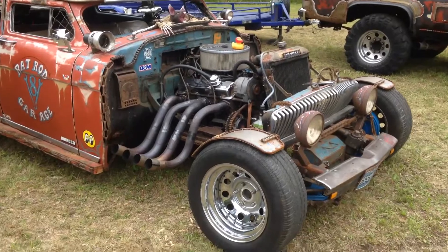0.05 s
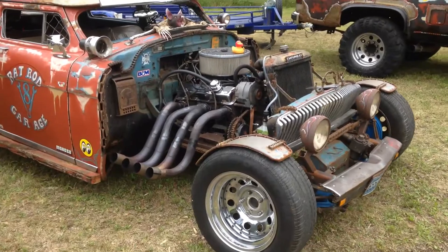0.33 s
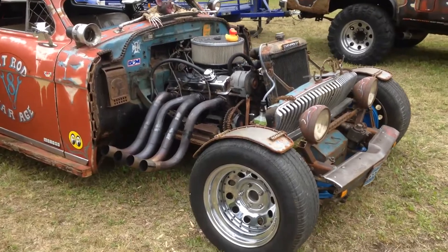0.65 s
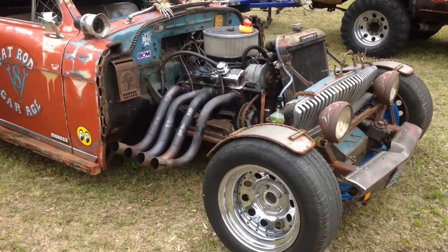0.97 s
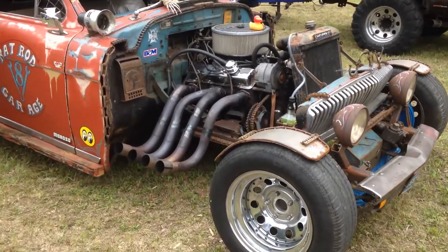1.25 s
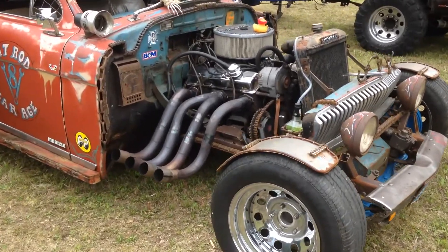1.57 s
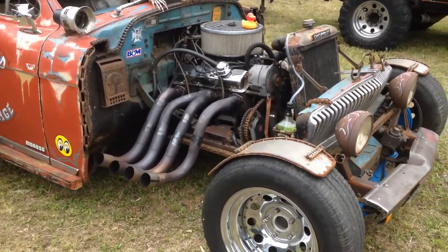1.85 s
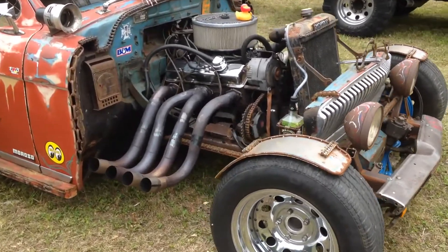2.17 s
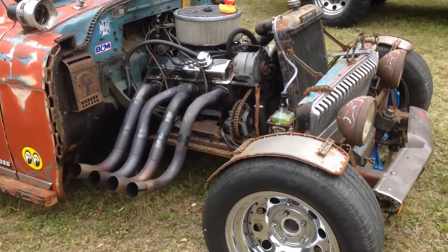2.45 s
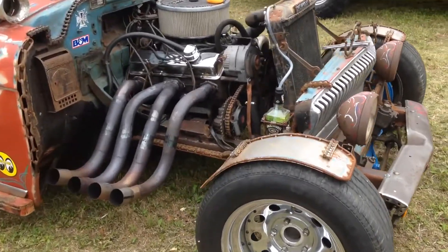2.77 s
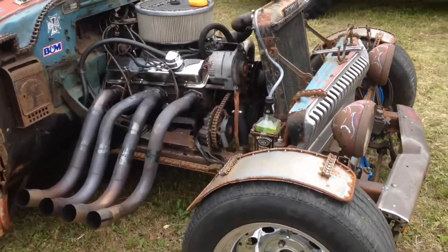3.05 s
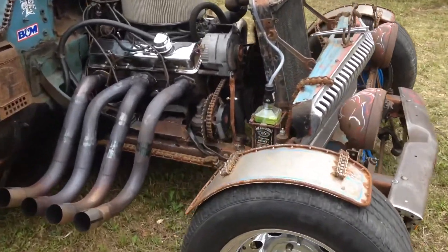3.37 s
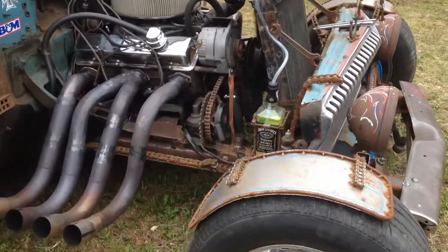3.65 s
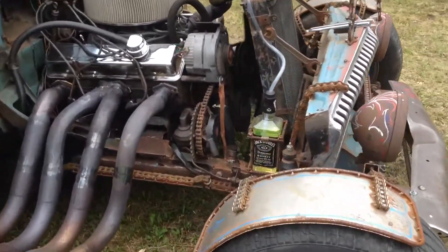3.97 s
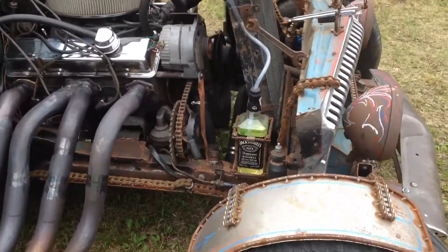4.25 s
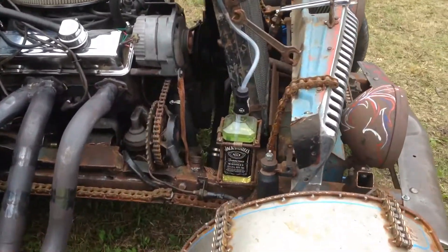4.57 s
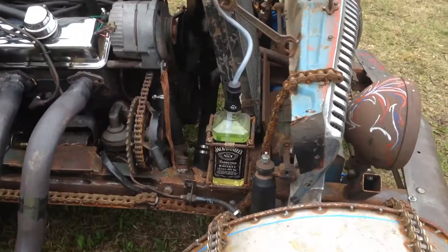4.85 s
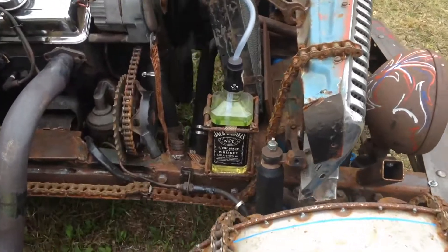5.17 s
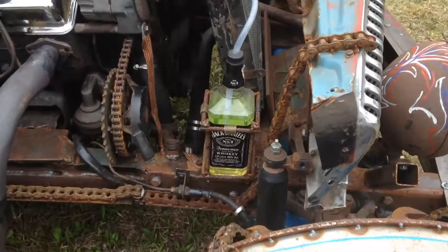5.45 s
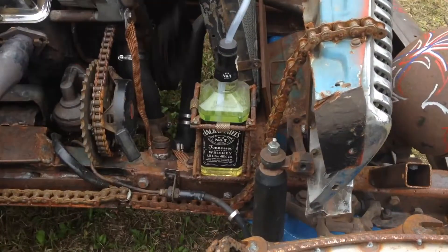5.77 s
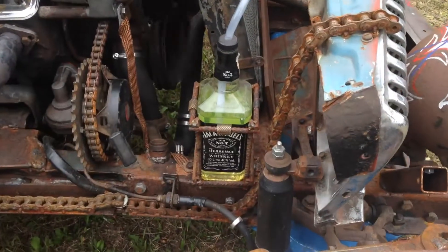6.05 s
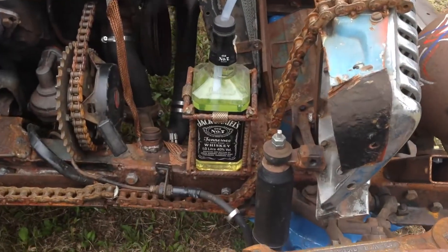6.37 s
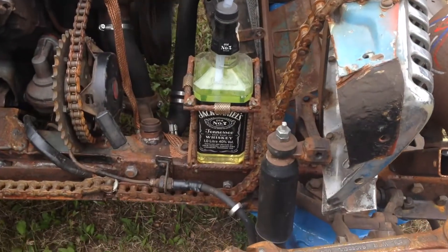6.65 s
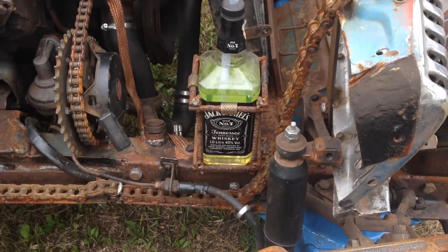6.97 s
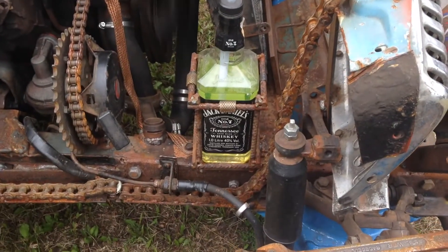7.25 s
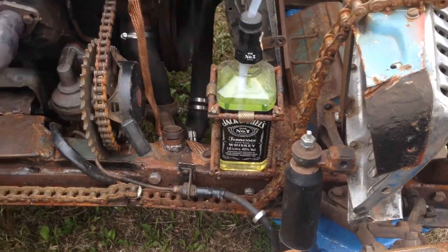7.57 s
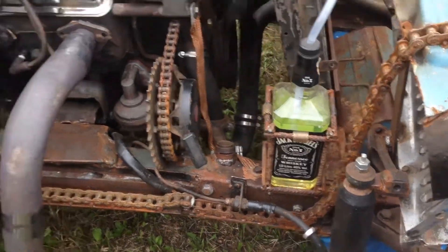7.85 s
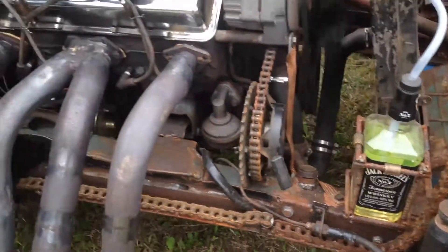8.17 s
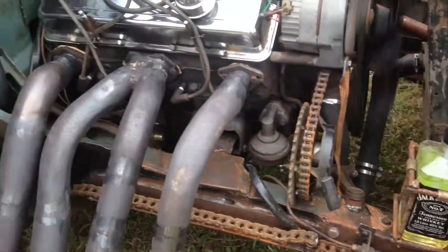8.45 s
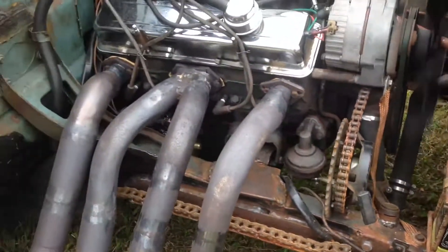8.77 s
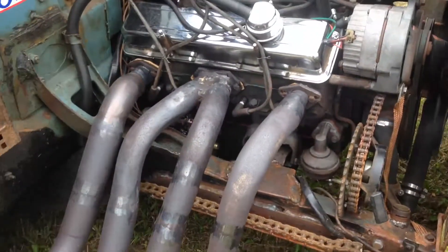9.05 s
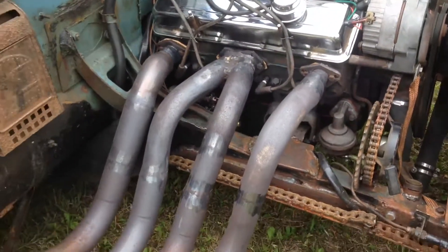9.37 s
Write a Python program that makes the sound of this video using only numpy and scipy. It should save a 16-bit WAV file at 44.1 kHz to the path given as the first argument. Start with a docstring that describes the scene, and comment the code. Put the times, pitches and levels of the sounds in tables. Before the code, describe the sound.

A V8 hot rod idles outdoors on grass through short open exhaust pipes. Deep, rapid thumps and a throaty bark run throughout, with sharp, rhythmic spits of gas on top and a steady rush of fan and belts underneath. The pipes ring faintly and sometimes clank. As the microphone moves in from beside the car to just over the pipes, the engine grows somewhat louder and fuller, holding its idle speed.

```python
"""On open grass, a V8 idles through eight short exhaust pipes while the microphone moves in close.
Each firing thumps its own pipe, then barks and throbs in the pipe's overtones. The nearest cylinders
also spit a sharp burst of gas once a cycle. The pipe steel rings lightly throughout, and a few
firings crack hard enough to clank it. Underneath runs the steady rush of fan, belts and intake."""
import sys
import numpy as np
from scipy import signal
from scipy.fft import rfft, irfft
from scipy.io import wavfile
from scipy.ndimage import uniform_filter1d

SR = 44100
rng = np.random.default_rng(int(sys.argv[2]) if len(sys.argv) > 2 else 0)


def pcm_store(signal):
    """Save signal as 16-bit PCM."""
    levels = np.round(np.clip(np.atleast_2d(signal), -1, 1) * 32767)
    wavfile.write(sys.argv[1], SR, levels.astype(np.int16).T)


N = 415422
TIME = np.arange(N) / SR

# exhaust valve openings: cycle_phase (0-1), bark_db, throb_db, spit_far_db, spit_near_db, swell_s
VALVE_OPENINGS = [(.11, 3, -13, -12, -7.5, 0.0034), (.233, 5, 7, 2, 1, 0.0038),
                  (.365, 0, 1.5, -36, -24, .0051), (.491, -0.5, 6.5, -2, .5, .0027),
                  (.622, -4.5, -4, -25, -23, 0.0038), (.783, 0, -5, -15.5, -19.5, 0.0019),
                  (.86, -4.5, -11, -15, -18, 0.0037), (.99, -6.5, -20, -27, -31, .005)]


def thumps(scatter_db=1.72, pipe_width_hz=25, deep_hz=68.7, deep_width_hz=5, deep_db=-3):
    """The low end: each firing is a pressure kick that rings the lowest note of its own pipe."""
    # one row a cylinder: cycle_phase (0-1), level_db, pitch_hz
    cylinders = [(.041, -5, 73), (.14, -9, 126), (.297, -6, 159), (.434, -7, 117), (.549, -19, 71),
                 (.666, -14, 164), (.796, -7, 103), (.945, -11, 180)]
    # boom of the space between pipes, body and ground: pitch_hz, width_hz
    booms = [(88, 24), (150, 17)]
    out = np.zeros(N)
    for phase, db, hz in cylinders:
        kicks = np.zeros(N)
        for s in firings(phase, jitter_s=0.00013):
            add(kicks, s, gain_of([db + scatter_db * rng.standard_normal()]))
        out -= resonate(kicks, hz, pipe_width_hz)
    for hz, width in booms:
        out = resonate(out, hz, width)
    return evened(out + gain_of(deep_db) * resonate(out, deep_hz, deep_width_hz))


def spits(near, tail_s=0.019, whistle_db=-11, crackle_db=2.5, scatter_db=1.6):
    """Turbulent gas jets swell and collapse in milliseconds, each with a faint whistle of its own."""
    # tone of escaping gas, from afar and close by: frequency_hz, level_db
    far_eq = [(200, -14), (700, -5.5), (1150, -4.5), (2000, -4.5), (2600, -5), (3900, 1), (5300, -1),
              (7500, -3.5), (9500, -3), (12000, -6), (15000, -16)]
    near_eq = [(200, -18), (700, 4), (980, -8), (1300, 0.5), (2100, -3.5), (2750, -3.5), (3900, -1.5),
               (5300, -3), (7500, -3), (9000, -7), (12000, -10), (15000, -18.5)]
    # pipe resonances that colour the spits, from afar and close by: pitch_hz, width_hz, far_db, near_db
    pipe_resonances = [(850, 44, 1, -14), (965, 51, 14.5, -11), (1270, 120, -14, 1), (1572, 85, 7.5, -14),
                       (1920, 93, 7, -14), (1870, 130, -39, -6), (2310, 114, -18, 5.5)]
    t, out = np.arange(SR // 20) / SR, np.zeros(N)
    for phase, _, _, far_db, near_db, swell_s in VALVE_OPENINGS:
        for s in firings(phase, jitter_s=.0002):
            close = np.interp(s, TIME, near)
            stretch = (1 + 0.28 * (close - .5)) * np.exp(.11 * rng.standard_normal())
            age = t / (swell_s * stretch)
            burst = (age * np.exp(1 - age)) ** 3
            # the engine bay scatters the burst into a tail, more so close in
            tail_gain = gain_of(between((-20, -15), close))
            tail = tail_gain * np.minimum(age, 1) ** 2 * np.exp((swell_s - t) / tail_s)
            hiss = rng.standard_normal(len(t))
            whistle = evened(resonate(hiss, rng.uniform(2960, 7940), width_hz=500))
            gas = hiss + gain_of(whistle_db) * whistle
            eddies = gain_of(crackle_db * evened(uniform_filter1d(rng.standard_normal(len(t)), size=24)))
            hit_db = between((far_db, near_db), close) + scatter_db * rng.standard_normal()
            add(out, s, gain_of(hit_db) * np.hypot(burst, tail) * eddies * gas)
    jets = crossfade_eq(out, far_eq, near_eq, near)
    return jets + sum(gain_of(between(ends_db, near)) * resonate(jets, hz, width)
                      for hz, width, *ends_db in pipe_resonances)


def beamed(jets, in_beam, treble_hz=9500, treble_db=(-3, 4)):
    """The jets' top end carries best straight out of the pipe mouths."""
    treble = signal.sosfiltfilt(signal.butter(2, treble_hz, "high", fs=SR, output="sos"), jets)
    return jets + (gain_of(between(treble_db, in_beam)) - 1) * treble


def bark(near, decay_s=0.013, roughness=0.67, scatter_db=2.0, lead_s=0.001964):
    """Higher overtones: every pipe has its own echo pattern, roughened afresh by each firing."""
    # tone of the bark, from afar and close by: frequency_hz, level_db
    far_eq = [(150, -31.5), (220, 4), (300, 4.5), (370, -11), (450, -10), (580, -6.5), (690, 1.5), (840, 2),
              (960, -3.5), (1100, -21), (1400, -13), (2000, -15.5), (3500, -25)]
    near_eq = [(150, -42.5), (230, -4), (335, -3), (410, -2), (500, 2), (580, -3), (690, 3), (780, -4),
               (900, -13.5), (1300, -14.5), (2000, -23), (3500, -32.5)]
    t, out = np.arange(SR // 16) / SR, np.zeros(N)
    fade = np.exp(-t / decay_s)
    for phase, db, *_ in VALVE_OPENINGS:
        # whitened noise: a smear in time with no colour of its own
        spectrum = rfft(rng.standard_normal(len(t)) * fade)
        echoes = evened(irfft(spectrum / abs(spectrum), len(t)) * np.exp(-t / (4 * decay_s)))
        for s in firings(phase, jitter_s=0.00015):
            grit = evened(rng.standard_normal(len(t)) * fade)
            gas = np.sqrt(1 - roughness ** 2) * echoes + roughness * grit
            hit_db = db * (1 - 0.4 * np.interp(s, TIME, near))  # close in, the pipes are more even
            add(out, s - lead_s, gain_of(hit_db + scatter_db * rng.standard_normal()) * gas)
    return crossfade_eq(out, far_eq, near_eq, near)


def throb(near, far_hz=292, near_hz=328, width_hz=110, scatter_db=2.5, late_s=0.00508):
    """The pipes' first overtone answers every kick cleanly, a little late."""
    kicks = np.zeros(N)
    for phase, _, db, *_ in VALVE_OPENINGS:
        for s in firings(phase):
            add(kicks, s + late_s, gain_of([db + scatter_db * rng.standard_normal()]))
    far = close = kicks
    for _ in range(3):
        far, close = resonate(far, far_hz, width_hz), resonate(close, near_hz, width_hz)
    return evened(between((evened(far), evened(close)), near))


def cracks(t60_s=0.05, overtone_ratio=1.2, overtone_db=-8):
    """Now and then a firing hits hard enough to clank the pipe."""
    # the hardest firings: start_s, level_db, pitch_hz
    hits = [(0.1372, -17, 1120), (0.3718, -18, 1130), (0.607, -14, 1240), (1.2995, -16.5, 1140),
            (4.5765, -15.5, 1310), (4.6917, -11.5, 1200), (5.1822, -13, 1186), (5.5282, -17, 1270),
            (5.7583, -11, 1226), (6.2357, -15, 1165), (6.6598, -16, 1225), (7.006, -15, 1380),
            (8.072, -12, 1190), (8.8865, -10, 1120), (9.238, -15, 1290), (9.3706, -16, 1190)]
    out = np.zeros(N)
    for s, db, hz in hits:
        clank = steel_ping(hz, t60_s, spread=0.061)
        overtone = steel_ping(overtone_ratio * hz, t60_s, spread=0.062)
        add(out, s, gain_of(db) * (clank + gain_of(overtone_db) * overtone))
    return out


def steel_ringing(jet_db, high_db=-17.0):
    """The steel rings a little in every cycle; its high modes follow the level of the jets."""
    # pings of the pipe steel: cycle_phase (0-1), pitch_hz, level_db, t60_s, scatter_db
    pings = [(.25, 1100, -1, 0.074, 2), (.4, 1280, -5.5, 0.11, 3), (.635, 1210, 3.5, .065, 1),
             (.64, 1680, -4, 0.067, 4.5), (.5, 1600, -9.5, .044, 4), (.5, 1850, -4, 0.041, 5),
             (.5, 2100, -1.5, 0.043, 2.5), (.635, 4800, 0, 0.05, 4), (.5, 4000, 4.5, 0.03, 6),
             (.8, 3900, -4, .022, 4)]
    # fader ride on the low ringing: time_s, level_db
    low_ride = [(0, -40), (1.5, -34.5), (2.6, -39.5), (4.6, -28), (5.2, -28), (7.35, -34.5), (8, -28),
                (9.42, -27.5)]
    low, high = np.zeros(N), np.zeros(N)
    for phase, hz, db, t60_s, scatter_db in pings:
        for s in firings(phase, jitter_s=.0006):
            strength = gain_of(db + scatter_db * rng.standard_normal())
            add(low if hz < 3000 else high, s, strength * steel_ping(hz, t60_s))
    return gain_of(curve(low_ride)) * evened(low) + gain_of(jet_db + high_db) * evened(high)


def steel_ping(hz, t60_s, spread=0.0924, attack_s=0.00028):
    """A shock front strikes a tight cluster of four steel modes."""
    t = np.arange(SR // 16) / SR
    modes_hz = hz * (1 + spread * rng.uniform(-1.01, 1, size=(4, 1)))
    ping = np.sin(2 * np.pi * (modes_hz * t + rng.random(size=(4, 1)))).sum(0)
    ping *= np.exp(-np.log(1000) * t / t60_s) * (1 - np.exp(-t / attack_s))
    return ping / abs(ping).max()


def rush():
    """Fan, belts and intake lay down a steady bed of noise."""
    # tone of the bed: frequency_hz, level_db
    rush_eq = [(15, 11), (45, 18), (200, 8), (800, 9), (1600, -1), (2700, -2), (4500, -5), (8000, -5),
               (12000, -11), (15000, -24)]
    return evened(colour(rng.standard_normal(N), rush_eq))


def firings(phase, jitter_s=0.000067, start_phase=.0534):
    """Times at which the four-stroke cycle (two crank turns) passes a given phase."""
    # the idle, hunting a little: time_s, speed_rpm
    idle = [(0.0, 1033.9), (0.72, 1023.9), (1.28, 1052.0), (1.74, 1019.6), (1.9, 1043.0), (2.65, 1049.8),
            (2.89, 1024.3), (3.49, 1005.8), (3.8, 1016.6), (4.48, 1006.3), (4.75, 1039.3), (5.79, 1044.4),
            (5.94, 1016.4), (6.15, 1038.9), (8.07, 1036.8), (8.23, 1016.7), (8.56, 1042.2), (9.42, 1020.2)]
    cycles = start_phase + np.cumsum(curve(idle)) / (2 * 60 * SR)
    marks = np.arange(np.ceil(cycles[-1])) + phase
    times = np.interp(marks[(marks > cycles[0]) & (marks < cycles[-1])], cycles, TIME)
    return times + jitter_s * rng.standard_normal(len(times))


def crossfade_eq(x, far_eq, near_eq, near):
    """The tone shifts as the microphone comes closer."""
    return evened(between((evened(colour(x, far_eq)), evened(colour(x, near_eq))), near))


def colour(x, eq, size=4096):
    """Minimum-phase EQ, so attacks stay sharp."""
    hz, db = np.transpose(eq)
    bins_hz = abs(np.fft.fftfreq(size, 1 / SR)) + 1
    log_gain = np.log(gain_of(np.interp(np.log(bins_hz), np.log(hz), db)))
    taps = np.fft.ifft(np.exp(np.conj(signal.hilbert(log_gain)))).real[:size // 2]
    return signal.oaconvolve(x, taps)[:N]


def resonate(x, hz, width_hz):
    """One resonance at unity gain."""
    return signal.lfilter(*signal.iirpeak(hz, hz / width_hz, fs=SR), x)


def add(mix, s, sound):
    """Lays a sound into the mix at time s."""
    at = int(round(s * SR))
    sound = sound[max(-at, 0):]
    part = mix[max(at, 0):][:len(sound)]
    part += sound[:len(part)]


def curve(points):
    """Automation: straight lines through (time_s, value) points."""
    return np.interp(TIME, *np.transpose(points))


def between(ends, share):
    """Slides from the first value to the second as share goes from 0 to 1."""
    return ends[0] + (ends[1] - ends[0]) * share


def gain_of(db):
    """Decibels to amplitude."""
    return 10 ** (np.asarray(db) / 20)


def evened(x):
    """Scales to rms 1."""
    return x / np.sqrt(np.mean(x ** 2) + 1e-20)


def scene(beam_db=4, echo_s=.005, echo_db=-13):
    """The mix swells as the microphone closes in; the grass returns one faint echo of the jets."""
    # the microphone's approach: time_s, nearness (0 beside the car, 1 over the pipes)
    approach = [(0, 0), (2.2, 0.16), (3.5, 0.38), (5, 0.78), (7, 0.83), (8.3, 0.9), (9.42, 0.84)]
    # its path across the jets' beam: time_s, alignment (0 off to the side, 1 in line)
    beam_path = [(0, 0.27), (2, .33), (3.2, 0.86), (4.4, 0.85), (5.4, 0.25), (7.3, 0.047), (8.3, 0.074),
                 (9.42, 0.67)]
    near, in_beam = curve(approach), curve(beam_path)
    # fader pairs: far_db, near_db
    thump_db, throb_db, bark_db = (-10.5, -8.5), (-36, -29.5), (-29.5, -22)
    spit_db, rush_db = (-25.5, -23), (-34, -27.5)
    jet_db = between(spit_db, near) + beam_db * in_beam
    jets = gain_of(jet_db) * beamed(spits(near), in_beam)
    ground_echo = gain_of(echo_db) * np.interp(TIME - echo_s, TIME, jets, left=0)
    bed = gain_of(between(rush_db, near)) * rush()
    pipes = (gain_of(between(thump_db, near)) * thumps()
             + gain_of(between(throb_db, near)) * throb(near)
             + gain_of(between(bark_db, near)) * bark(near))
    return (pipes + jets + ground_echo + steel_ringing(jet_db) + cracks() + bed)[None]


def record(dry, knee=.78, ceiling=.97, cutoff_hz=15500):
    """A soft clip rounds the loudest peaks, then a steep low-pass trims the top."""
    over, headroom = np.maximum(abs(dry) - knee, 0), ceiling - knee
    rounded = np.sign(dry) * (np.minimum(abs(dry), knee) + headroom * np.tanh(over / headroom))
    lowpass = signal.firwin(401, cutoff_hz, window=("kaiser", 9), fs=SR)
    return signal.oaconvolve(rounded, lowpass[None], "same")


dry = scene()
out = record(dry)
pcm_store(out)
```